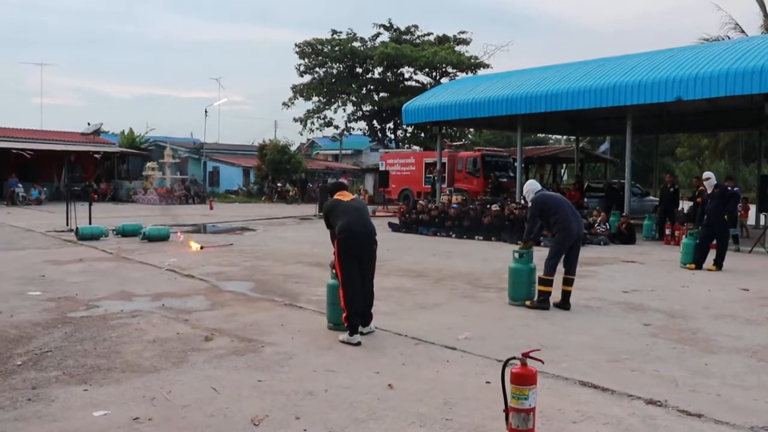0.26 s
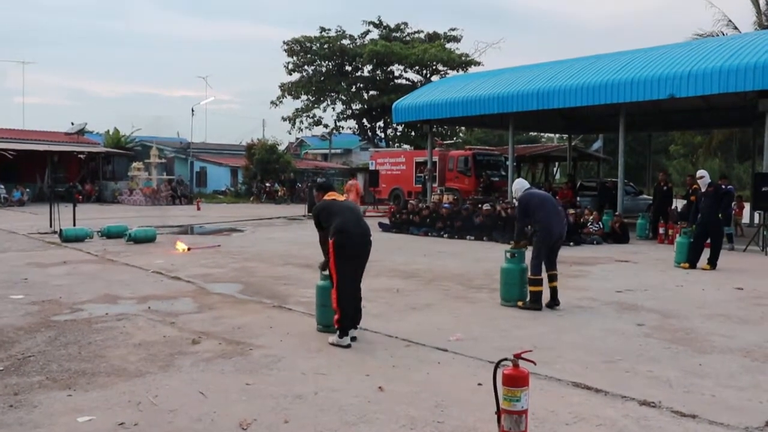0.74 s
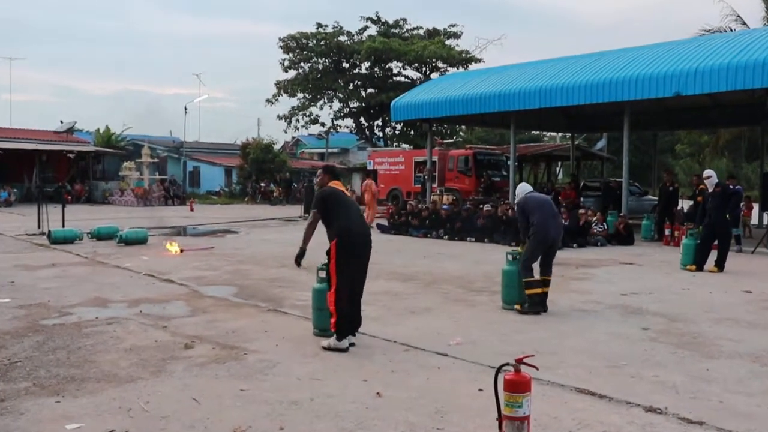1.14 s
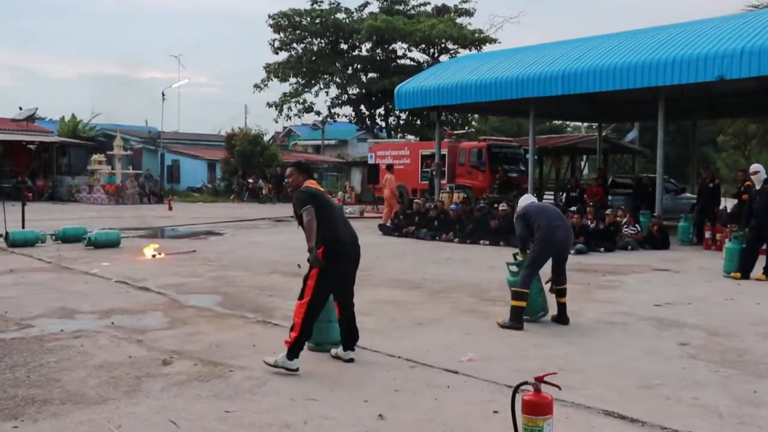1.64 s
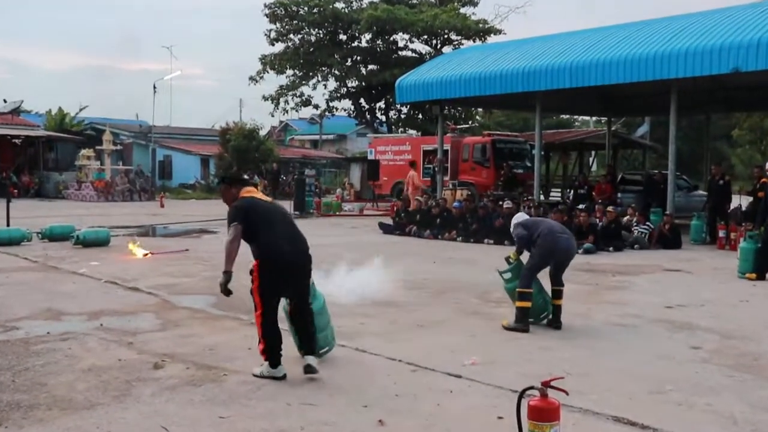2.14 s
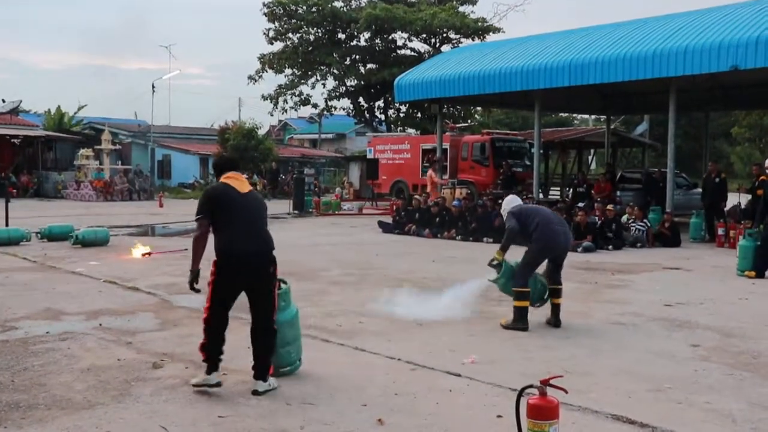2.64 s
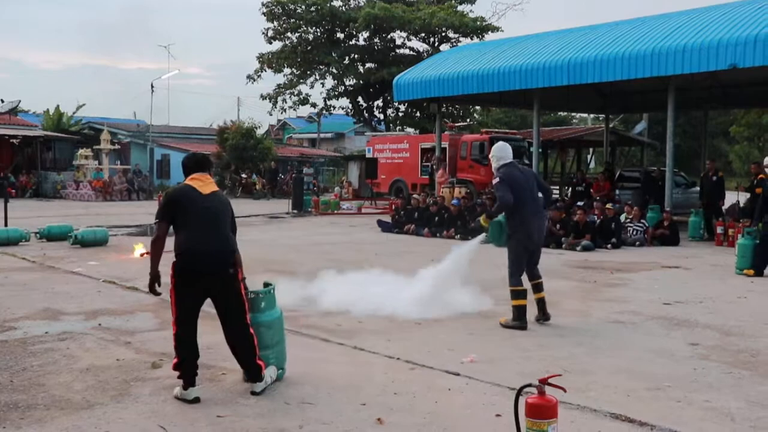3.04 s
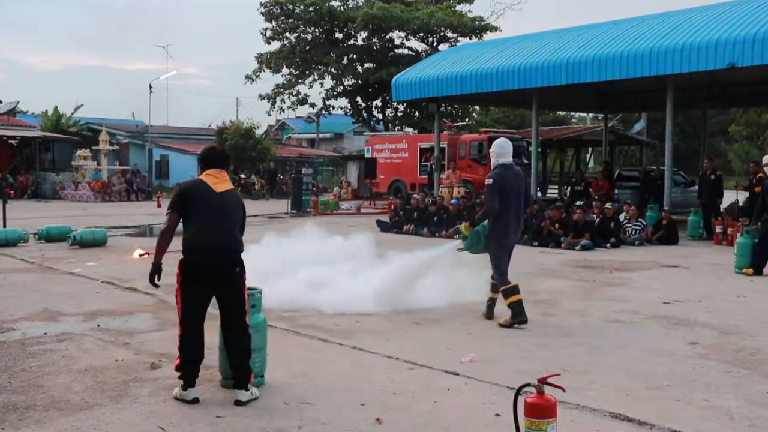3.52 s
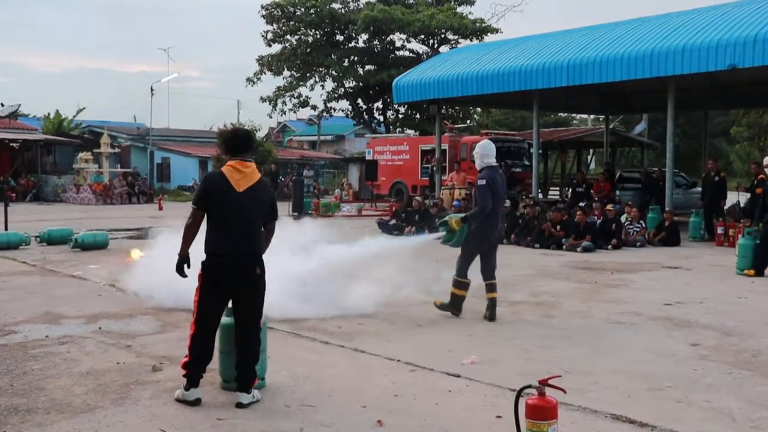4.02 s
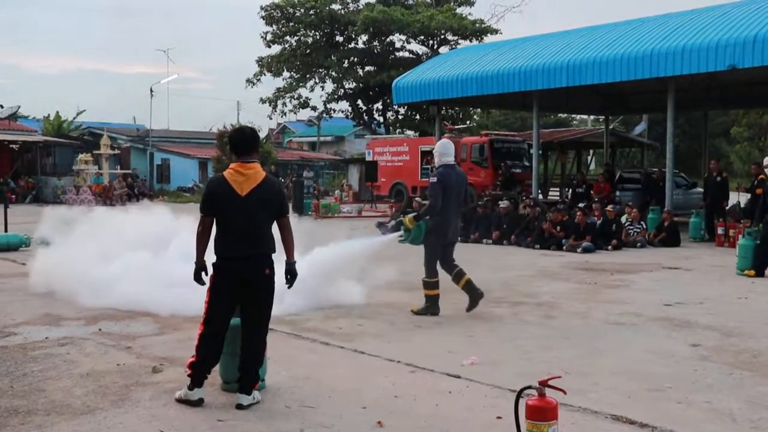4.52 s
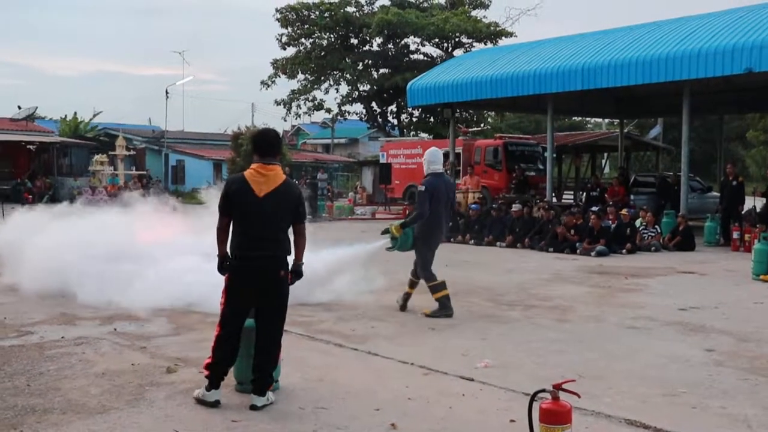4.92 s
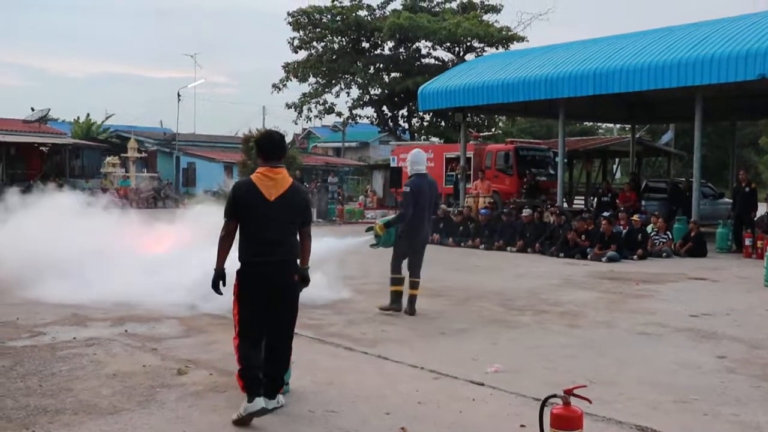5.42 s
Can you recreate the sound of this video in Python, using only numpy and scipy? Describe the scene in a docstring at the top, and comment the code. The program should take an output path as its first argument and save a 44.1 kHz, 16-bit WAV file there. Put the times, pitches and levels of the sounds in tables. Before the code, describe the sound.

A hissing gas flame pops and briefly whistles in an open yard, giving way to the steady spray of an extinguisher.

```python
"""Gas flame and extinguisher in a concrete yard

Gas burns from a hose: a hissing jet with a hollow roar, small ignition pops, a whistle at the outlet.
From about 3 s a man's extinguisher takes over with a duller spray while the jet sinks back.
A far engine hums underneath. Two microphone ports each colour the hiss in their own way."""
import sys
import numpy as np
from scipy import signal
from scipy.fft import rfft, irfft, next_fast_len
from scipy.io import wavfile
from scipy.ndimage import uniform_filter1d

SR = 44100
rng = np.random.default_rng(int(sys.argv[2]) if len(sys.argv) > 2 else 0)


def generate_wav(signal):
    """Clip the signal to [-1, 1] and save it as 16-bit WAV at the path in sys.argv[1]."""
    frames = np.transpose(np.atleast_2d(signal))
    scaled = np.clip(frames, -1, 1) * 32767
    pcm = np.round(scaled).astype(np.int16)
    wavfile.write(sys.argv[1], SR, pcm)


N = 249606
FRAME, HOP = 1024, 128  # samples
FRAME_S = np.arange(N // HOP + 9) * HOP / SR
BIN_HZ = np.fft.rfftfreq(FRAME, 1 / SR)
TIME_S = np.arange(N) / SR


def amp(db):
    """dB to gain."""
    return np.exp(np.asarray(db) * (np.log(10) / 20))


def pan(side_db):
    """Stereo gains: left up, right down by side_db."""
    return amp([[side_db], [-side_db]])


def unit_rms(x):
    """Scale to rms 1."""
    return x / np.sqrt(np.mean(x ** 2) + 1e-20)


def at_hz(points, hz):
    """Interpolate (f/Hz, value) rows over log frequency."""
    f, value = np.transpose(points)
    return np.interp(np.log(hz + 1), np.log(f + 1), value)


def per_frame(rows):
    """Interpolate (t/s, values...) rows: one curve per value column."""
    times_s, *columns = np.transpose(rows)
    return [np.interp(FRAME_S, times_s, column) for column in columns]


def ramp(x, start, end):
    """Linear rise, 0 to 1."""
    return np.clip((x - start) / (end - start), 0, 1)


def bell(x, centre, sigma):
    """Gaussian of height 1."""
    return np.exp(-.5 * ((x - centre) / sigma) ** 2)


def bumps_db(rows):
    """Sum of smooth level bumps; rows: t/s, sigma/s, level/dB."""
    return sum(db * bell(FRAME_S, at_s, sigma_s) for at_s, sigma_s, db in rows)


def gate(t, start_s, length_s, attack_s, release_s):
    """Attack, hold, release."""
    end_s = start_s + length_s
    return ramp(t, start_s, start_s + attack_s) * (1 - ramp(t, end_s, end_s + release_s))


def falter_db(start_s, length_s, depth_db):
    """Level lost while a stream briefly falters."""
    return depth_db * gate(FRAME_S, start_s, length_s, attack_s=0.03, release_s=0.083)


def patches(span_s, span_hz):
    """Smooth random time-frequency field, rms 1."""
    field = rng.standard_normal((len(FRAME_S), len(BIN_HZ)))
    for axis, cells in enumerate([span_s * SR / HOP, span_hz * FRAME / SR]):
        for _ in range(2):
            field = uniform_filter1d(field, max(1, round(cells)), axis, mode="wrap")
    return unit_rms(field)


def flutter(slow_hz, fast_hz):
    """Random wavering per frame, rms 1."""
    rates_hz = np.geomspace(slow_hz, fast_hz, num=30)[:, None]
    return unit_rms(np.sin(2 * np.pi * (rates_hz * FRAME_S + rng.random(rates_hz.shape))).sum(0))


def band_power(colour, level_db, pitch=1):
    """Time-frequency power of a noise band; pitch scales its frequencies."""
    power = amp(at_hz(colour, BIN_HZ / np.reshape(pitch, (-1, 1)))) ** 2
    return power / power.sum(1, keepdims=True) * amp(level_db)[:, None] ** 2


def resonance(hz, width_hz):
    """Noise-fed narrow mode, its swings partly levelled by saturation."""
    f = np.fft.fftfreq(next_fast_len(N), 1 / SR)
    spectrum = bell(f, hz, width_hz / 2) * np.exp(2j * np.pi * rng.random(len(f)))
    tone = np.fft.ifft(spectrum)[:N]
    return unit_rms(tone.real / np.sqrt(abs(tone) + 1e-12))


def ringing_gain(sigma_hz=150):
    """Narrow bands where the hiss briefly rings or turns hollow."""
    # peaks and hollows: t/s, sigma/s, f/Hz, gain/dB
    rings = [(1.748, .1, 3900, 2.5), (1.78, .08, 6450, 5.5), (2.388, 0.14, 900, -8), (2.712, .14, 3850, 6),
             (2.72, 0.2, 6280, 6.5), (3.095, 0.11, 1540, -7.5), (3.958, .1, 3940, 3.5),
             (4.078, 0.077, 6350, 7.5), (4.1, 0.18, 9230, 8), (4.142, .07, 1620, -9), (4.68, 0.16, 5020, 7),
             (5.2, 0.49, 3295, -3.5)]
    at_s, sigma_s, hz, db = np.transpose(rings)
    return amp((db * bell(FRAME_S[:, None], at_s, sigma_s)) @ bell(BIN_HZ, hz[:, None], sigma_hz))


def turbulence(power, balance, lead, eddy_db, ripple_db):
    """Stream noise at two ports, with quick eddies and slow ripples from reflections."""
    # likeness of the ports: f/Hz, coherence
    port_coherence = [(60, .93), (130, .93), (300, .85), (650, .75), (1300, .87), (2500, .8), (5000, .78),
                      (9000, .74), (14000, .58)]
    coherence = np.clip(at_hz(port_coherence, BIN_HZ), 0, 1)
    lead_rad = at_hz(lead, BIN_HZ)
    lean = amp(at_hz(balance, BIN_HZ) / 2)
    shape = (2, *power.shape)
    left, independent = rng.standard_normal(shape) + 1j * rng.standard_normal(shape)
    right = (coherence * left + np.sqrt(1 - coherence ** 2) * independent) * np.exp(-1j * lead_rad)
    spectra = np.array([left * lean, right / lean])
    mid_power = (lean ** 2 + lean ** -2 + 2 * coherence * np.cos(lead_rad)) / 4
    ripples = np.array([patches(0.13, 170), patches(0.66, 170)]) * ramp(BIN_HZ, 540, 3150)
    eddies = patches(span_s=.018, span_hz=900)
    spectra *= np.sqrt(power / mid_power) * ringing_gain() * amp(eddy_db * eddies + ripple_db * ripples)
    _, noise = signal.istft(spectra.swapaxes(1, 2), nperseg=FRAME, noverlap=FRAME - HOP)
    return noise[:, :N] * np.sqrt(3 * FRAME / HOP / 8)


def yard(x):
    """Weak reflections on slowly changing paths add a fine, shifting comb."""
    # roof and wall echoes: delay/s, gain/dB, drift/(s/s)
    echoes = [(.0093, -16, 0.0029), (.021, -16.5, 0.007), (.047, -18.5, .0003)]
    reflected = [sum(amp(db) * np.interp(TIME_S - delay_s - drift * TIME_S, TIME_S, port, left=0)
                     for delay_s, db, drift in echoes) for port in x]
    return x + np.array(reflected)


def engine():
    """Far engine idling on two wavering low orders."""
    # orders: f/Hz, width/Hz, level/dB before panning
    orders = [(49, 9.8, -63.5), (107, 12, -67.5)]
    return pan(side_db=3.0) * sum(amp(db) * resonance(hz, width_hz) for hz, width_hz, db in orders)


def flame_pops(gain_db=5.5, delay_s=0.00253, sharpen=1.17, lag_cycles=.95, echo_db=-8.0, t60_s=0.13):
    """Each igniting gas pocket pushes the air once; the bass lags, so it chirps down. The yard echoes."""
    # ignitions: t/s, relative level/dB, f/Hz before sharpening
    pops = [(0.018, -36.5, 441), (0.103, -41, 738), (0.254, -35, 458), (0.295, -32, 830), (0.454, -38, 305),
            (0.495, -36, 528), (0.565, -29.5, 890), (0.741, -32.5, 439), (0.841, -28, 905),
            (0.996, -39, 454), (1.133, -27, 875), (1.257, -35, 468), (1.383, -35, 373), (1.42, -33.5, 372),
            (1.43, -27.5, 893), (1.455, -32, 635), (1.5, -30.5, 441), (1.522, -36, 433), (1.56, -29.5, 293),
            (1.654, -30.5, 265), (1.746, -30, 869), (1.841, -31, 487), (1.947, -28, 318),
            (1.988, -29.5, 520), (2.028, -29.5, 361), (2.34, -34, 635), (2.389, -43, 619),
            (2.932, -31, 530)]
    pulses = np.zeros(N)
    for at_s, db, hz in pops:
        phase = 2 * np.pi * sharpen * hz * (TIME_S - at_s - delay_s)
        pulses += amp(db) * np.cos(phase) * bell(phase, 0, 0.74 + hz / 480)  # high pops: more cycles
    pulses = signal.sosfilt(signal.butter(2, [152.0, 1430.0], "bandpass", fs=SR, output="sos"), pulses)
    size = next_fast_len(N)
    lag = np.exp(-2j * np.pi * lag_cycles * np.log(np.fft.rfftfreq(size, 1 / SR) + 1))
    chirps = irfft(rfft(pulses, size) * lag, size)[:N]
    tail = rng.standard_normal((2, SR // 4)) * amp(-60 * TIME_S[:SR // 4] / t60_s)
    echo = signal.fftconvolve(chirps[None], tail / np.linalg.norm(tail[0]), axes=1)[:, :N]
    return amp(gain_db) * pan(side_db=5.5) * (chirps + amp(echo_db) * echo)


def whistle(gain_db=0.5, rolloff_db_per_oct=15.5):
    """Gas blows four near-harmonic pipe modes in bursts, strongest near each burst's favoured pitch."""
    # pipe modes: f/Hz, width/Hz, gain/dB
    modes = [(627, 46, 3), (1272, 39, -3.5), (1852, 21, 1), (2666, 80, -7)]
    # bursts at the outlet: start/s, length/s, relative level/dB, favoured f/Hz
    blows = [(1.98, 0.34, -36, 1650), (2.329, .08, -29, 1860), (2.415, 0.034, -23, 1830),
             (2.457, 0.068, -30, 1480), (2.541, .12, -34, 1290), (2.95, 0.084, -31.5, 1700),
             (3.105, 0.059, -30.5, 2600), (3.138, 0.15, -29, 1570), (3.52, 0.034, -28, 1650)]
    tones = np.zeros(N)
    for hz, width_hz, mode_db in modes:
        drive = np.zeros(N)
        for start_s, length_s, db, favoured_hz in blows:
            envelope = gate(TIME_S, start_s, length_s, attack_s=0.018, release_s=0.036)
            drive += amp(db - rolloff_db_per_oct * abs(np.log2(hz / favoured_hz))) * envelope
        tones += amp(mode_db) * drive * resonance(hz, width_hz)
    return amp(gain_db) * pan(side_db=1.0) * tones


def extinguisher(hiss_gain_db=0.5, nozzle_gain_db=2.0, comb_spacing_hz=417):
    """The valve opens: broad hiss, hollow nozzle tone, the cloud rushing over the ground."""
    # spray strength: t/s, relative level/dB, treble lift/dB
    spray_curve = [(2.9, -33.5, 10), (3.18, -37, 1), (3.36, -31, -1.5), (3.75, -26.5, -2),
                   (4.02, -24.5, -6.5), (4.12, -23.5, 4), (4.26, -31.5, 1), (4.5, -28.5, 0.5),
                   (5.2, -27, 3.5), (5.66, -27.5, -2)]
    # nozzle tone as the horn turns: t/s, pitch factor, relative level/dB
    aim_curve = [(2.95, 0.9, -35), (3.3, 0.94, -35.5), (3.65, 0.97, -30), (4.1, 0.94, -32),
                 (4.3, 1.03, -31.5), (4.56, 0.98, -26.5), (5.0, 1, -32.5), (5.6, 1.02, -32.5)]
    # cloud rush: t/s, relative level/dB
    rush_curve = [(3.1, -38), (3.55, -32), (4.25, -34.5), (5.17, -32), (5.66, -35.5)]
    # spectra: f/Hz, relative density/dB
    hiss_colour = [(1530, -37), (2600, -6.5), (2810, -15.5), (3420, -5), (4010, 0), (4560, -1),
                   (5110, -5.5), (5350, -5), (6430, -8.5), (7770, -15.5), (10700, -22), (11600, -18.5),
                   (14300, -24), (16000, -27)]
    nozzle_colour = [(880, -32), (1500, -10), (1860, -28), (2030, 1.5), (2330, 4.5), (2450, 4), (2750, -6),
                     (3100, -7), (4030, -17), (6820, -120)]
    rush_colour = [(18, -55), (30, -18), (71, -19), (98, -15), (130, -14), (192, -10.5), (353, -11),
                   (404, -15.5), (660, -11.5), (865, -11), (1250, -1), (1700, -8.5), (2210, -38),
                   (3740, -120)]
    # left over right: f/Hz, level/dB
    balance = [(60, 10), (110, 2), (200, 1.5), (380, 2.5), (700, -0.5), (1290, 0), (2380, 5), (4400, 10.5),
               (8120, 7.5), (15000, 20)]
    # left ahead of right: f/Hz, phase/rad
    lead = [(0, 0), (1640, -0.4), (3100, -0.5), (3700, 1.2), (5000, -0.7), (5680, -2), (6630, -1.5),
            (8350, -0.7), (9220, -3), (10600, -6), (12400, -9.5), (13300, -4), (14600, -6), (16400, -7.7)]
    spray_db, treble_db = per_frame(spray_curve)
    pitch, tone_db = per_frame(aim_curve)
    rush_db, = per_frame(rush_curve)
    lost_db = falter_db(start_s=4.14, length_s=0.067, depth_db=4.8)
    waver_db = 0.3 * flutter(12, 70)
    hiss = band_power(hiss_colour, spray_db + hiss_gain_db + waver_db - 0.48 * lost_db)
    hiss *= amp(treble_db[:, None] * ramp(BIN_HZ, 5000, 10800)) ** 2
    # a ground reflection combs the spray as the man walks off
    comb_db = (2.5 + 4.5 * np.cos(2 * np.pi * BIN_HZ / comb_spacing_hz)) * bell(BIN_HZ, 4360, 440)
    hiss *= amp(ramp(FRAME_S, 4.7, 5.5)[:, None] * comb_db) ** 2
    nozzle = band_power(nozzle_colour, tone_db + nozzle_gain_db + waver_db - lost_db, pitch)
    rush = band_power(rush_colour, rush_db - lost_db + 0.52 * flutter(5, 50))
    valve = ramp(FRAME_S, 2.51, 3.2)[:, None]
    return turbulence(valve * (hiss + nozzle + rush), balance, lead, eddy_db=0.87, ripple_db=2.5)


def gas_jet(hiss_gain_db=2.0, flame_db=-47.5):
    """Burning jet: bright outlet hiss, hollow roar near 2 kHz, low flame rumble."""
    # jet strength: t/s, relative level/dB, treble lift/dB
    jet_curve = [(0.0, -27, 1.5), (1.15, -27, 0), (1.4, -28, 1), (1.75, -28, 6.5), (2.3, -27, 5),
                 (2.76, -29, 0.5), (3.03, -37, 5.5), (3.3, -34, -4.5)]
    # spurts of brighter hiss: t/s, sigma/s, gain/dB
    spurts = [(0.29, .018, 2), (0.55, 0.029, 0.9), (0.84, 0.023, 1.5), (2.78, .025, 2)]
    # surges and sags at the roar's resonance: t/s, sigma/s, gain/dB
    surges = [(0.6, 0.026, 3), (0.77, .04, 1.5), (0.97, 0.041, -6.5), (1.1, 0.022, 4), (1.35, 0.011, -2),
              (1.48, 0.064, 4), (2.02, 0.032, 7), (2.44, .012, 9), (2.59, 0.033, -1.5), (2.7, 0.057, 8.5)]
    # spectra: f/Hz, relative density/dB
    early_hiss = [(1410, -29.5), (2400, -8), (3120, -13.5), (3830, -6), (4790, -9.5), (5350, -14.5),
                  (5840, -9.5), (6420, -13), (7010, -9.5), (7960, -13), (10000, -2), (12400, -20.5),
                  (15100, -10), (16000, -10)]
    late_hiss = [(1410, -38), (2400, -3), (3190, -7.5), (3460, -4), (4020, 0.5), (5520, -5.5), (6170, -5),
                 (7710, -8.5), (8610, -2.5), (9180, -7), (10100, -1.5), (11600, -13.5), (13200, -14.5),
                 (16000, -10.5)]
    early_roar = [(590, -74), (1000, -31), (1070, -18.5), (1320, -17.5), (1390, -14), (1600, -6.5),
                  (1840, 3), (1970, -1.5), (2110, -6), (3000, -24), (3900, -38), (6600, -120)]
    late_roar = [(850, -26), (1450, -14), (1860, -0.5), (2040, -4), (2260, -2), (2560, -15.5),
                 (2770, -20.5), (3000, -18), (3900, -42), (6600, -120)]
    flame_colour = [(65, -42), (110, -12), (125, -18), (231, -8.5), (302, -5.5), (445, -6), (560, -3.5),
                    (1100, -4), (1430, -1.5), (2420, -120)]
    # left over right: f/Hz, level/dB
    balance = [(60, 2.5), (110, 3.0), (200, 2.2), (380, 1.2), (700, 0.5), (1290, 0.47), (2380, 5),
               (4400, 8.4), (8120, 8.5), (15000, 2.5)]
    # left ahead of right: f/Hz, phase/rad
    lead = [(0, -1.5), (1550, 0.7), (3010, -2.5), (3620, 1.5), (5080, -2), (7150, -2.5), (8270, -4),
            (8700, -3.5), (9560, -4.5), (10900, -8.5), (12100, -6), (13700, -4), (15200, -18),
            (16400, -12.6)]
    jet_db, treble_db = per_frame(jet_curve)
    lost_db = falter_db(start_s=1.875, length_s=0.1, depth_db=7.1)
    swing_db = bumps_db(spurts) - lost_db
    hiss_db = jet_db + hiss_gain_db + swing_db + 0.17 * flutter(10, 70)
    treble_db += 1.2 * swing_db
    spread = ramp(FRAME_S, 1.17, 2.2)[:, None]  # the bands near 1.85 and 10 kHz widen
    hiss = (1 - spread) * band_power(early_hiss, hiss_db) + spread * band_power(late_hiss, hiss_db)
    hiss *= amp(treble_db[:, None] * ramp(BIN_HZ, 5200, 17700)) ** 2
    roar_db = jet_db - 0.49 * lost_db + 0.53 * flutter(8.2, 80)
    roar = (1 - spread) * band_power(early_roar, roar_db) + spread * band_power(late_roar, roar_db)
    roar *= amp(bumps_db(surges)[:, None] * bell(BIN_HZ, 1890, 190)) ** 2
    lull_db = -2.5 * bell(FRAME_S, 2.5, 0.14)  # the flame sinks while the outlet whistles
    flame = band_power(flame_colour, flame_db + lull_db + 2.65 * flutter(3.7, 50))
    return turbulence(hiss + roar + flame, balance, lead, eddy_db=1.25, ripple_db=2.0)


def scene():
    """All sources in the open yard."""
    return yard(gas_jet() + whistle() + extinguisher()) + flame_pops() + engine()


def record(dry, low_cut_hz=70.0, top_shelf_db=-5.5, high_cut_hz=15800):
    """Two microphone ports: own dips and peaks, dulled top, bass cut, band limit."""
    # port dips and peaks: f/Hz, sigma/Hz, gain/dB
    left_port = [(3286, 197, -9.5), (4000, 170, 0), (5430, 96, -3.5), (5720, 57, 1), (7900, 110, -1.5),
                 (11450, 160, -4), (15000, 97, -9)]
    right_port = [(1770, 230, -4), (3280, 243, 8), (4750, 140, -4), (6100, 100, -12.5), (7560, 710, 6),
                  (8800, 81, -9), (11500, 100, 3), (15700, 72, -5)]
    size = next_fast_len(N + FRAME)
    hz = np.fft.rfftfreq(size, 1 / SR)
    port_db = np.array([sum(db * bell(hz, centre_hz, sigma_hz) for centre_hz, sigma_hz, db in port)
                        for port in (left_port, right_port)])
    shelf_db = top_shelf_db * ramp(hz, 13500, 15400)
    coloured = irfft(rfft(dry, size) * amp(port_db + shelf_db), size)[:, :N]
    highpass = signal.butter(3, low_cut_hz, "highpass", fs=SR, output="sos")
    lowpass = signal.firwin(1023, high_cut_hz, window=("kaiser", 9), fs=SR)
    return signal.oaconvolve(signal.sosfilt(highpass, coloured), lowpass[None], "same")


dry = scene()
out = record(dry)
generate_wav(out)
```